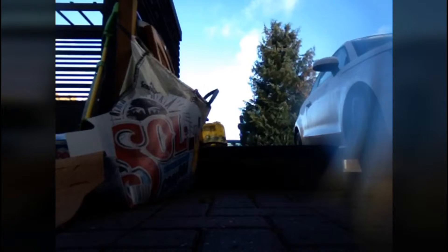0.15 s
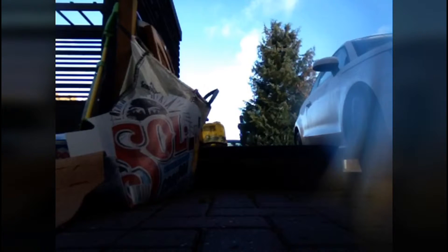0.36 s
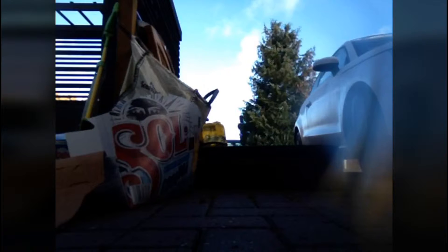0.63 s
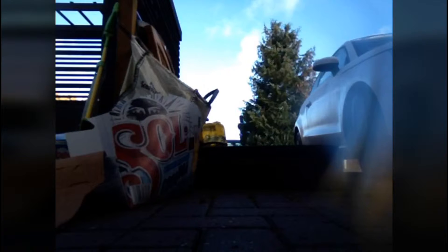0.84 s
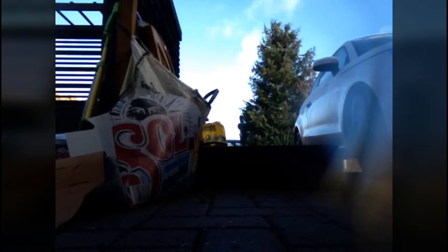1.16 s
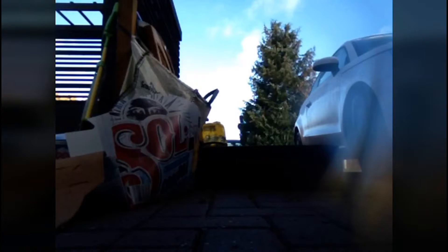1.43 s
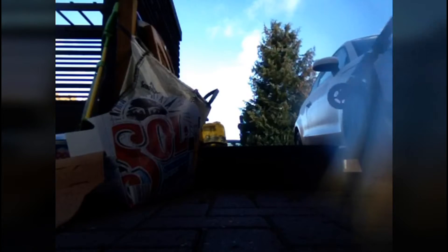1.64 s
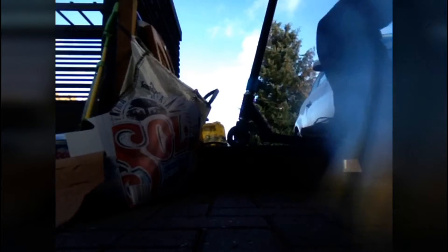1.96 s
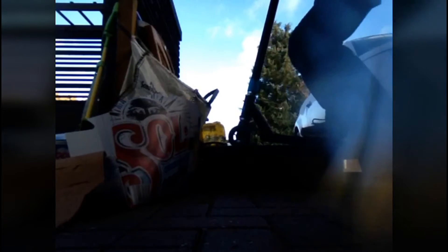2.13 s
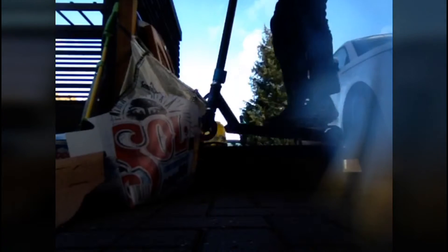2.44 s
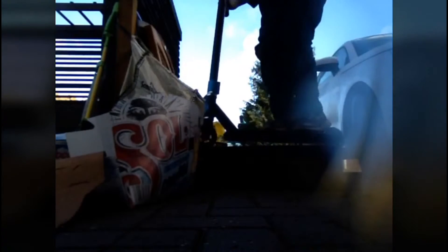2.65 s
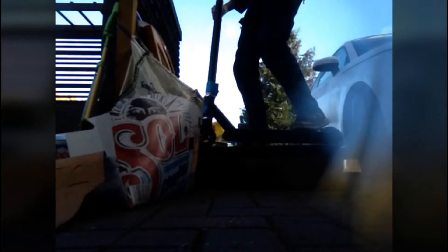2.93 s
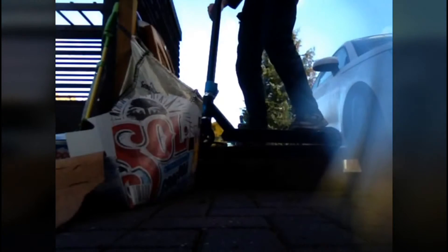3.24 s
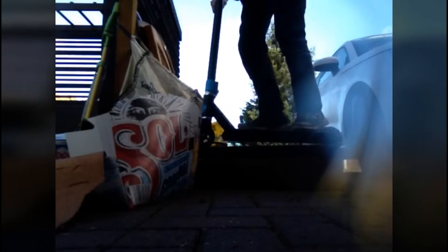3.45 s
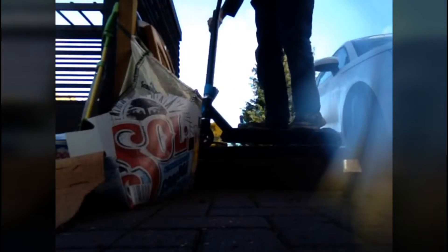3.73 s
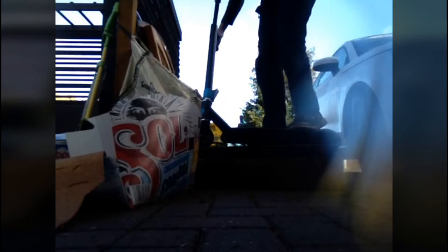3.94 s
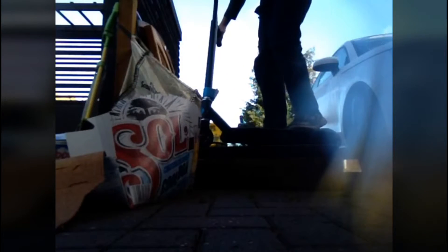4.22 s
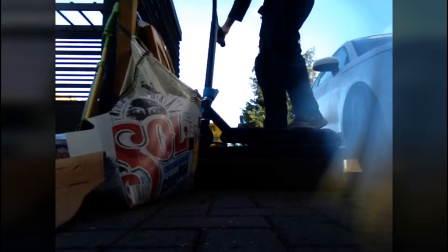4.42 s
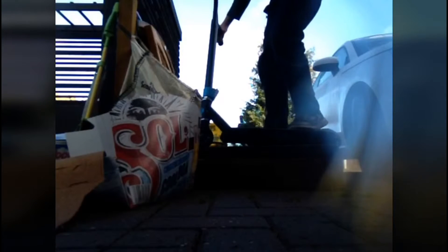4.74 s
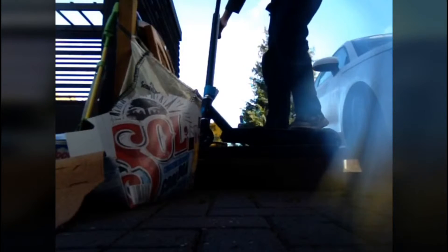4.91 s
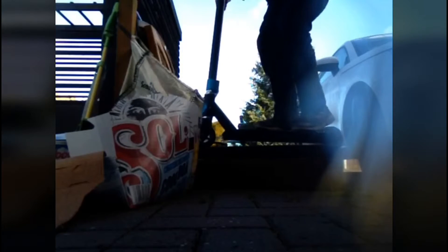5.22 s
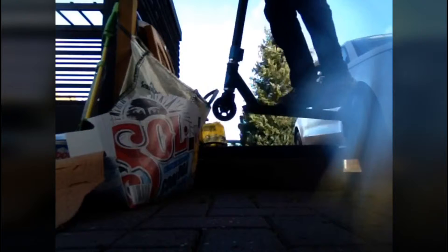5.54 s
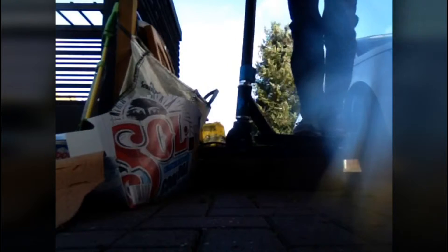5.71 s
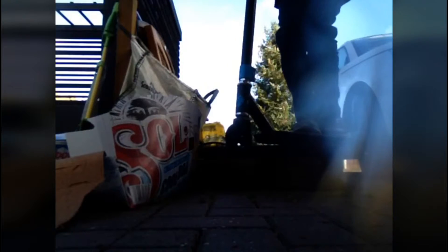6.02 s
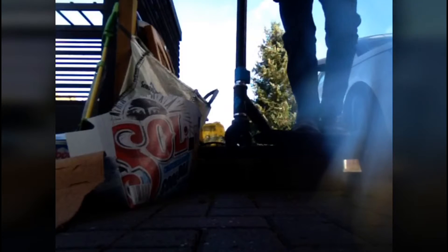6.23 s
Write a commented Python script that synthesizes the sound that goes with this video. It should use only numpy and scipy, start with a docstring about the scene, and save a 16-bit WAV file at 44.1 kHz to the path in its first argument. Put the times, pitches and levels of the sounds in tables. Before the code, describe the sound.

A stunt scooter clatters, rattles and drops on block paving close by, then goes quiet before a hop lands with hard knocks.

```python
"""A stunt scooter on block paving beside a parked car, close to a phone lying on the ground.
First it is wheeled along, knocking and rattling, and the brake spring sings in short fits; then it is
dropped, stood on and dragged. After a quieter stretch it is hopped, and a few light knocks end the scene.
Blows and grit excite resonances of deck, bars and fork; fence and car side answer. Far traffic hums
throughout as filtered noise; small birds, gliding tones blurred by distance, call early and in the lull."""
import sys
import numpy as np
from scipy import signal
from scipy.fft import rfft, irfft, next_fast_len
from scipy.io import wavfile
from scipy.ndimage import uniform_filter1d, map_coordinates

SR = 44100
rng = np.random.default_rng(int(sys.argv[2]) if len(sys.argv) > 2 else 0)


def to_wav(s):
    """Save 16-bit WAV."""
    ch = np.atleast_2d(s).T  # columns
    pcm = np.round(np.clip(ch, -1, 1) * 32767)  # PCM
    wavfile.write(sys.argv[1], SR, pcm.astype(np.int16))


N = 280917  # samples, about 6.4 s

# All levels are those ahead of the recorder's gain control.
# Close contacts of the scooter. Each row: start in seconds, clack level in dB, thud in dB re the clack,
# rattle in dB re the clack, loudest ring in Hz.
CONTACTS = [(0.048, -37, -13.5, -7, 2270), (.082, -51.5, -6, -10, 2000), (0.184, -50.5, -20, -7.5, 2100),
            (.213, -49.5, -11, -3, 2640), (0.275, -45.5, -5, -25, 226), (.301, -55, -24, -6.5, 2340),
            (0.344, -57.5, 11.5, -22, 280), (.372, -25.5, -5.5, -4, 540), (.379, -19.5, -20.5, -8, 2410),
            (0.492, -45.5, -22, -26, 3400), (0.562, -48.5, -5, -20, 2660), (0.672, -47, -18, -11, 2530),
            (0.691, -61, 12.5, 3, 300), (.908, -53, -7, -3.5, 2220), (0.98, -38.5, -30, -16, 3360),
            (1.016, -44.5, -13, -30, 680), (1.037, -40, -15, -18, 1580), (1.041, -28, -9, -6.5, 2600),
            (1.064, -33, -7.5, -13, 710), (1.115, -46, 3, -28, 1190), (1.171, -39.5, -20, -7.5, 1236),
            (1.215, -42.5, -0.5, -12, 220), (1.323, -38.5, -13.5, -23, 1530),
            (1.431, -42.5, -6, -12.5, 1160), (1.461, -34, -10, -19, 1430), (1.489, -52, 11, -15, 240),
            (1.513, -29.5, -5.5, -35, 1050), (1.543, -31.5, 2, -9, 226), (1.57, -34.5, -15, -10.5, 5000),
            (1.582, -28.5, -0.5, -3.5, 635), (1.696, -24.5, -13.5, -10.5, 1250), (1.721, -32, -7, -6, 1180),
            (1.728, -22, -14.5, -6.5, 2150), (1.844, -47.5, -0.5, -30, 650), (1.922, -39, -20, -6, 2300),
            (1.993, -22, 11, -3.5, 210), (2.01, -19, -3, -6, 384), (2.022, -24.5, 0, 0, 1540),
            (2.035, -35, 11, -9, 227), (2.048, -29.5, 1.5, -16, 390), (2.073, -36, 7.5, -4, 596),
            (2.258, -41.5, -1, -2.5, 368), (2.346, -63, -10, 8, 8000), (2.366, -67, -12, 12, 9000),
            (2.402, -49, 3.5, -13, 495), (2.467, -61, -25, -28, 2520), (2.486, -38.5, -3.5, -2, 686),
            (2.561, -19.5, 1, -6, 444), (2.608, -38.5, 25, -31, 217), (2.616, -30.5, 16.5, -20, 384),
            (2.821, -47, 1, -9, 225), (2.859, -48.5, 0, -15, 805), (2.949, -45.5, 11, -8.5, 270),
            (2.986, -61.5, 25.5, 1, 284), (3.03, -52.5, -2, -22, 996), (3.099, -48.5, -14, -36.5, 1100),
            (3.542, -61.5, 4, -24, 700), (3.593, -44, -2.5, -0.5, 610), (3.81, -62, -1.5, -31, 876),
            (3.912, -61, -9, 7, 4500), (4.406, -60, 0.5, -16.5, 1097), (5.218, -50.5, 2.5, -20, 800),
            (5.243, -50.5, -6, -10, 900), (5.357, -55, -4, -22, 880), (5.427, -53, -7, -20, 900),
            (5.454, -59, 7, -19, 1200), (5.515, -43, -25, -4.5, 1560), (5.569, -28, -2.5, -0.5, 2200),
            (5.66, -27.5, -14.5, -26.5, 626), (5.735, -40, -12, -12.5, 2100), (5.767, -43, 1, -4, 465),
            (5.785, -29.5, -22, -8, 940), (5.811, -18, 4.5, -9.5, 437), (5.829, -26.5, -21, -1.5, 483),
            (5.916, -49, 9.5, 1.5, 220), (6.153, -68.5, 15, -23.5, 206.4), (6.334, -57.5, -1, 2, 4000),
            (6.347, -46.5, -1.5, -15, 470)]
# Wheels rolling on the blocks. Each row: time in seconds, level in dB, deck rumble in dB re that level.
WHEEL_ROLL = [(0, -66, 0.5), (.35, -64, -3), (.5, -49.5, -1), (.64, -71, -7), (.97, -58, -4.5),
              (1.1, -44, -1), (1.3, -58, 3), (1.5, -47.5, 0), (1.62, -51, 2.5), (1.82, -60, 2.5),
              (2.2, -71, 8), (2.4, -57, 1.5), (2.7, -83, 4), (2.84, -59.5, 14.5), (3.1, -99, -8.5),
              (3.45, -70.5, 12), (3.9, -89.5, 1), (5.15, -77, 6), (5.45, -71, 2), (5.55, -48.5, 7),
              (5.78, -54.5, -3), (6, -75, -6)]
# A shoe or wheel drags across the blocks. Each row: start in seconds, length in seconds, level in dB.
DRAGS = [(0.279, 0.044, -60), (0.643, 0.18, -60.5), (1.836, 0.19, -45.5), (2.333, 0.14, -63.5),
         (2.491, 0.061, -44), (2.81, 0.067, -57.5), (3.41, 0.075, -75), (3.923, .1, -45),
         (5.226, 0.1, -56.5), (5.383, 0.092, -60)]
# How a drag is shared out: deck, bars and fork, each in dB re the drag's level.
DRAG_PARTS_DB = (-10.5, -3, -6)
# No weight on the deck, so it rings freely. Each row: from seconds, to seconds.
UNLOADED = [(.37, 0.84), (1.03, 1.5), (5.5, 9.3)]
# Resonances of the deck, the bars and the fork. Each row: frequency in Hz, level in dB, t60 in seconds.
DECK_MODES = [(168, -4, .06), (224, 1, .07), (296, -12, .05), (395, 1, .09), (486, -2, .15), (572, -4, .08),
              (650, -4, .07)]
BAR_MODES = [(810, 0, .035), (1095, 0, .04), (1250, 0, .04), (1430, -2, .035), (1610, -5, .03),
             (1856, -3, .04), (2035, -1, .035), (2310, -1, .03), (2700, -1, .035), (3210, -1, .025),
             (3790, 0, .025)]
FORK_MODES = [(4450, -3, .03), (5050, -3, .03), (5630, -2, .035), (7990, 0, .025), (9000, -3, .02),
              (10830, -1, .025)]
# Broad colour of thud, clack and rattle, one curve each. Each row: frequency in Hz, relative level in dB.
PART_COLOURS = [
    [(30, -36), (110, -14.5), (170, -7), (600, -5.5), (1100, -22), (3000, -64.5)],
    [(300, -41), (700, -5), (1000, 0.5), (2500, -4), (4500, -12), (9000, -25)],
    [(2000, -44), (4500, -7), (7000, -5), (11000, -4), (15000, -15)],
]
# The brake spring sings in fits while the wheel turns. Each row: start in seconds, end in seconds,
# start pitch in Hz, end pitch in Hz, level in dB.
SPRING_NOTES = [(1.15, 1.205, 1225, 1197, -42), (1.27, 1.34, 1330, 1273, -49.5),
                (1.365, 1.41, 1283, 1300, -45.5), (1.435, 1.48, 1246, 1385, -36.5)]
# Far birds. Each row: start in seconds, end in seconds, start pitch in Hz, end pitch in Hz, level in dB.
BIRD_CALLS = [(.78, .86, 4250, 4400, -65), (.74, .98, 3350, 3600, -71), (4.72, 4.9, 7400, 7400, -79),
              (4.95, 5.06, 7900, 7850, -80), (5.12, 5.36, 3750, 3400, -70), (5.3, 5.42, 3050, 2900, -70.5)]
# Reverberation off fence and car side. Each row: frequency in Hz, t60 in seconds.
YARD_DECAY = [(200, 0.25), (1500, 0.091), (12000, 0.14)]
# Far traffic, then microphone hiss. Each row: frequency in Hz, relative level in dB.
TRAFFIC_COLOUR = [(15, -78.5), (25, -46.5), (64, -29), (133, -6.5), (253, -4), (359, -8), (410, -9.5),
                  (684, -11), (826, -17), (1140, -18.5), (2230, -27.5), (3260, -30.5), (15500, -31.5)]

BLOW_SAMPLES = 16384  # room for one blow and its ring
# Chatter of a contact with -27.5 dB clack, -10.5 dB rattle and 700 Hz ring; the parts scale it in knocks().
CONTACT_T60_S = 0.072
LONGER_PER_DB, LOOSER_PER_DB = 0.0676, 0.06  # log growth of t60 per dB of clack, and of rattle
SHORTER_PER_OCTAVE = 0.083  # log loss of t60 per octave of loudest ring
FREE_DB, FREE_LONGER = -14, 2.3  # free ring re the blows in dB; its t60 over the loaded deck's
ROLL_HISS_DB = -12.5  # the fork's share of the rolling
CLICKS_PER_S, CLICK_DB = 230, 16  # loose parts clatter on the grit; click size re the grit
DRAG_EDGE = 0.44  # share of a drag's length spent rising, and again falling
YARD_DB = -13.5  # reverberation re the direct scooter
TRAFFIC_DB = -61
TOP_HZ = 15250  # where the recorder's steep treble cut begins


def knocks():
    """Close contacts: the deck thuds, the bars clack, the loose fork and clamp rattle briefly."""
    start_s, clack_db, thud_db, rattle_db, spot_hz = np.transpose(CONTACTS)
    # harder and rattlier contacts chatter longer, high-ringing ones shorter
    growth = LONGER_PER_DB * (clack_db + 27.5) + LOOSER_PER_DB * (rattle_db + 10.5)
    t60 = CONTACT_T60_S * np.exp(growth - SHORTER_PER_OCTAVE * np.log2(spot_hz / 700))
    rise = 0.0025 + 0.011 * t60  # long contacts also build up slowly
    thud_colour, clack_colour, rattle_colour = PART_COLOURS
    thud = struck(DECK_MODES, thud_colour, spot_hz, 4 * rise, 0.5 * t60,
                  dull_db=-14, focus_db=16, tick=0.2, push=2.5)
    clack = struck(BAR_MODES, clack_colour, spot_hz, rise, 1.13 * t60,
                   dull_db=-8, focus_db=20.5, tick=0.97, push=0.34)
    rattle = struck(FORK_MODES, rattle_colour, spot_hz, 0.44 * rise, 0.81 * t60,
                    dull_db=-7.5, focus_db=3.5, tick=0.42, push=0.04)
    mixed = amp(thud_db)[:, None] * thud + clack + amp(rattle_db)[:, None] * rattle
    blows = amp(clack_db)[:, None] * mixed
    out = np.zeros(N + BLOW_SAMPLES)
    for start, blow in zip(np.round(start_s * SR).astype(int), blows):
        out[start:start + BLOW_SAMPLES] += blow
    return out[:N]


def struck(modes, colour, spot_hz, rise, t60, dull_db, focus_db, tick, push):
    """A clean push, a tick and uneven chatter drive the modes; those near the loudest ring are favoured."""
    t, f = np.arange(BLOW_SAMPLES) / SR, np.fft.rfftfreq(BLOW_SAMPLES, 1 / SR)
    burst = amp(-60 * t / t60[:, None]) * (1 - np.exp(-t / rise[:, None]))
    shape = burst + tick * amp(-60 * t / 0.033)
    # separate cracks inside a blow: the level steps every 128 samples
    slips = np.repeat(rng.standard_normal((len(rise), BLOW_SAMPLES // 128)), repeats=128, axis=1)
    noise = rng.standard_normal((len(rise), BLOW_SAMPLES))
    chatter = shape * amp(4.5 * slips) * noise * (t < 0.25)
    chatter[:, 40] += push * np.linalg.norm(chatter, axis=1)  # rings the modes cleanly

    octaves_away = np.abs(np.log2(np.transpose(modes)[0] / spot_hz[:, None]))
    scatter_db = 3 * rng.standard_normal(octaves_away.shape)
    weights = amp(-focus_db * np.minimum(octaves_away, 0.5) + scatter_db)

    spread = np.minimum(np.abs(np.log2((f + 1) / spot_hz[:, None])), 1.6)
    colour_db = along(colour, f) - focus_db / 3 * spread
    # minimum phase: the colour adds nothing ahead of the blow
    mirrored_db = np.c_[colour_db, colour_db[:, -2:0:-1]]
    log_response = signal.hilbert(mirrored_db * np.log(10) / 20)
    causal = np.exp(np.conj(log_response))[:, :len(f)]

    response = (weights @ ringing(modes, f) + amp(dull_db)) * causal
    sound = irfft(rfft(chatter) * response, BLOW_SAMPLES)
    loudest = uniform_filter1d(np.abs(sound), size=256).max(axis=1, keepdims=True)
    return sound / loudest


def free_ring(blows):
    """Blows on the unloaded deck leave its lasting modes ringing until a foot or the ground damps them."""
    t = np.arange(N) / SR
    gate = 1. * sum((t > start) & (t < end) for start, end in UNLOADED)
    lifted = uniform_filter1d(gate, size=600)
    lasting = np.array([mode for mode in DECK_MODES if mode[2] > 0.075])
    free_modes = lasting * [1, 1, FREE_LONGER]
    drive = blows * lifted
    ring = filtered(drive, lambda f: ringing(free_modes, f).sum(axis=0))
    return amp(FREE_DB) * np.std(drive) * lifted * ring


def rolling():
    """Grit under wheels and shoes: uneven grains and clicks shake deck, bars and fork; drags are brighter."""
    out, t = 0, np.arange(N) / SR
    shared_db = 0.68 * wobble(35) + 3 * wobble(150)
    roll_db, rumble_db = curves(WHEEL_ROLL)
    roll = amp([roll_db + rumble_db, roll_db, roll_db + ROLL_HISS_DB])
    drag = 0
    for start, length, db in DRAGS:
        to_edge = np.minimum(t - start, start + length - t)
        drag = drag + amp(db) * np.clip(to_edge / (DRAG_EDGE * length), 0, 1)
    parts = zip((DECK_MODES, BAR_MODES, FORK_MODES), PART_COLOURS, (-18, -7, -1.5))
    for part, (modes, colour, dull_db) in enumerate(parts):
        level = roll[part] + drag * amp(DRAG_PARTS_DB[part])
        clicks = (rng.random(N) < CLICKS_PER_S / SR) * amp(CLICK_DB + 2 * rng.standard_normal(N))
        own_db = 1.0 * wobble(45)  # each part wavers partly in its own time
        grit = rng.standard_normal(N) * amp(shared_db + own_db) + clicks

        def response(f):
            """The part's modes over a dull body, in its broad colour."""
            return (ringing(modes, f).sum(axis=0) + amp(dull_db)) * amp(along(colour, f))

        out = out + level * filtered(grit, response)
    return out


def brake_spring():
    """The spring sings as narrow, gliding tones."""
    return whistle(SPRING_NOTES, width_hz=97)


def yard(x):
    """Fence and car answer from about 9 ms on: a noise tail whose frequencies die at their own speeds."""
    hz, t, z = signal.stft(rng.standard_normal(SR // 2), SR, nperseg=256)
    decay = amp(-60 * t / along(YARD_DECAY, hz)[:, None])
    tail = signal.istft(z * decay, SR, nperseg=256)[1]
    return signal.fftconvolve(np.pad(x, (400, 0)), tail / np.linalg.norm(tail))[:N]


def far_birds():
    """Small birds call faintly, their gliding tones smeared wide by distance."""
    return whistle(BIRD_CALLS, width_hz=320)


def traffic():
    """A low far hum with microphone hiss: coloured noise whose level wavers a little."""
    hum = filtered(rng.standard_normal(N), lambda f: amp(along(TRAFFIC_COLOUR, f)))
    return amp(TRAFFIC_DB + 0.31 * wobble(9.7) + 0.2 * wobble(51)) * hum


def whistle(notes, width_hz):
    """Gliding tones that swell and fade; random in-phase and quadrature levels smear them into narrow noise."""
    out, t = 0, np.arange(N) / SR
    for start, end, start_hz, end_hz, db in notes:
        pitch_hz = np.interp(t, [start, end], [start_hz, end_hz])
        phase = 2 * np.pi * np.cumsum(pitch_hz) / SR
        progress = np.clip((t - start) / (end - start), 0, 1)
        swell = np.sqrt(np.abs(np.sin(np.pi * progress))) * amp(3 * wobble(30))
        tone = wobble(width_hz) * np.sin(phase) + wobble(width_hz) * np.cos(phase)
        out = out + amp(db) * swell * tone
    return out


def ringing(modes, f):
    """Response of one causal, damped resonance per row, signs alternating."""
    hz, db, t60 = np.transpose(modes)[..., None]
    width = np.log(1000) / (np.pi * t60)  # Hz; a faster decay rings wider
    signs = (-1) ** np.arange(len(modes))[:, None]
    return signs * amp(db) * 1j * f * width / (hz * hz - f * f + 1j * f * width)


def filtered(x, response):
    """x times a response of frequency, brought to standard deviation 1."""
    m = next_fast_len(N + SR // 2)
    y = irfft(rfft(x, m) * response(np.fft.rfftfreq(m, 1 / SR)), m)[:N]
    return y / np.std(y)


def wobble(rate):
    """A smooth random curve, rate knots a second."""
    knots = rng.standard_normal(int(N * rate / SR) + 4)
    return map_coordinates(knots, [np.arange(N) * rate / SR])


def curves(rows):
    """One value per sample for each column after the time."""
    s, *cols = np.transpose(rows)
    return [np.interp(np.arange(N) / SR, s, c) for c in cols]


def along(points, hz):
    """Values between (Hz, value) points on a log frequency axis."""
    f, v = np.transpose(points)
    return np.interp(np.log(hz + 1), np.log(f + 1), v)


def amp(db):
    """Decibels to amplitude."""
    return 10 ** (np.asarray(db) / 20)


def scene():
    """Scooter close to the microphone, fence and car around it, birds and traffic far off."""
    blows = knocks()
    scooter = blows + free_ring(blows) + brake_spring()
    near = scooter + amp(YARD_DB) * yard(scooter) + rolling()
    return (near + far_birds() + traffic())[None]


def record(dry):
    """Gain control ducks at loud blows and recovers slowly; peaks are rounded and the top treble cut."""
    level_db = 10 * np.log10(np.abs(uniform_filter1d(dry[0] ** 2, size=441)) + 1e-12)
    recovery_db = 14 * np.arange(N) / SR  # the held level falls 14 dB a second
    held_db = np.maximum.accumulate(level_db + recovery_db) - recovery_db
    over_db = np.maximum(held_db + 24.5, 0)
    duck_db = uniform_filter1d(0.31 * over_db, size=2001, origin=1000)
    ducked = dry * amp(-duck_db)
    rounded = ducked / (1 + np.abs(ducked / 0.52) ** 4) ** (1 / 4)  # the converter nears full scale
    m = next_fast_len(N + 4096)
    cut_db = np.clip((np.fft.rfftfreq(m, 1 / SR) - TOP_HZ) / 25, 0, 80)  # 1 dB every 25 Hz
    return irfft(rfft(rounded, m) * amp(-cut_db), m)[:, :N]


dry = scene()
out = record(dry)
to_wav(out)
```